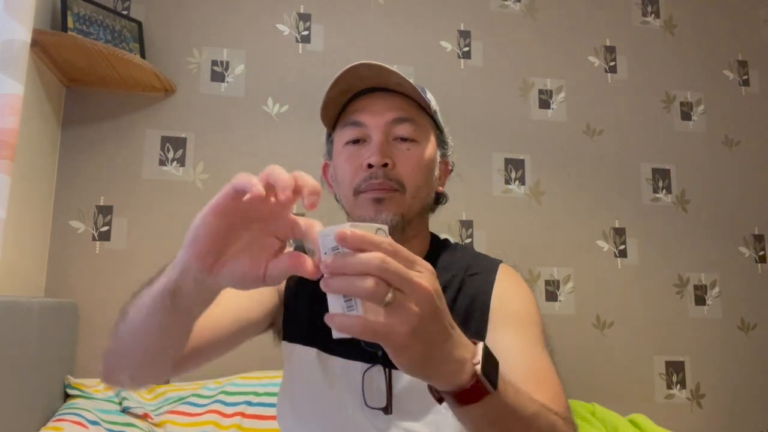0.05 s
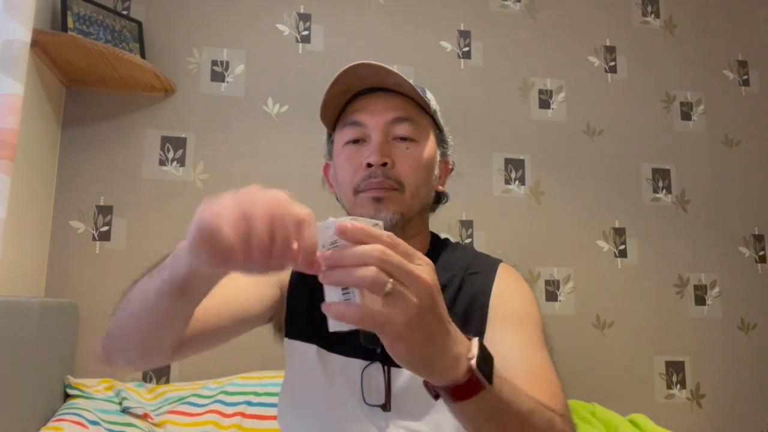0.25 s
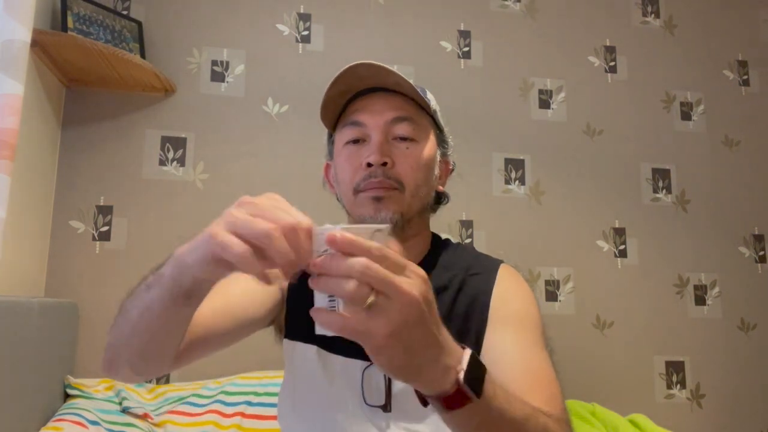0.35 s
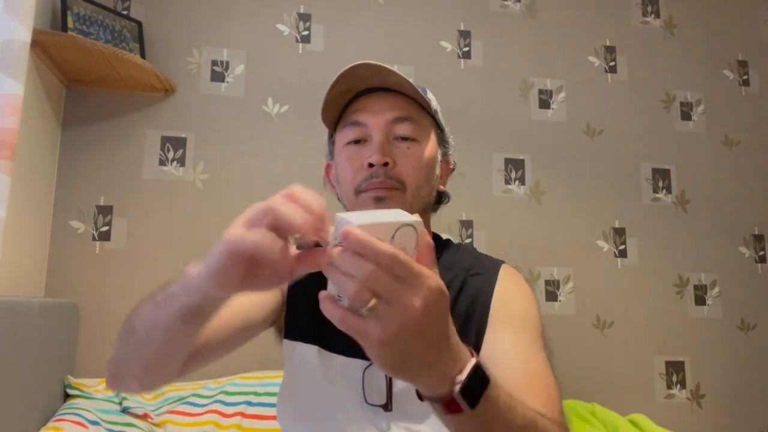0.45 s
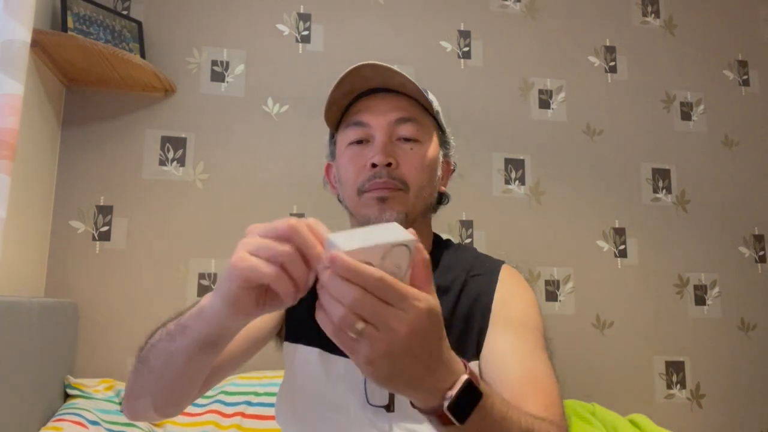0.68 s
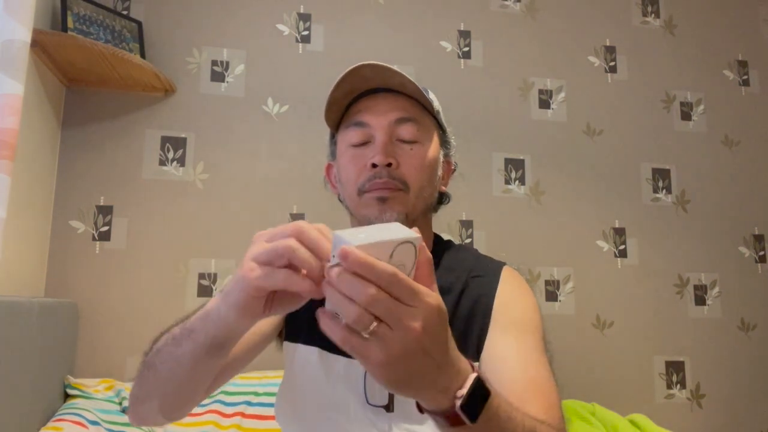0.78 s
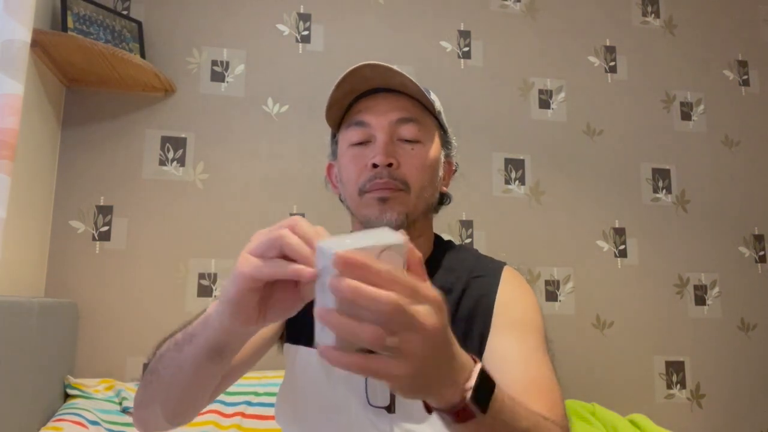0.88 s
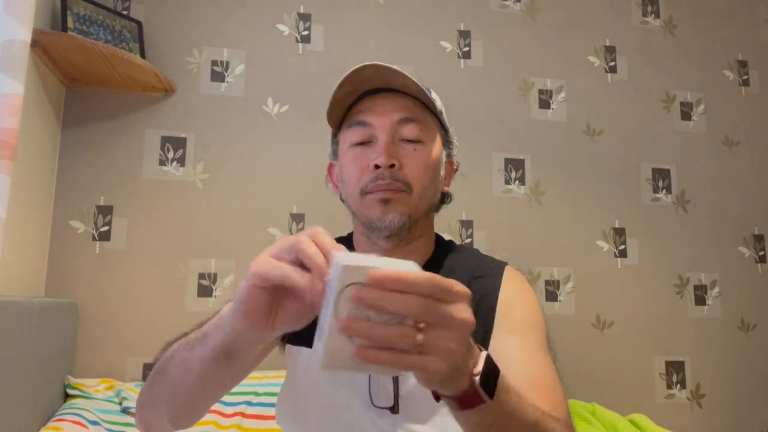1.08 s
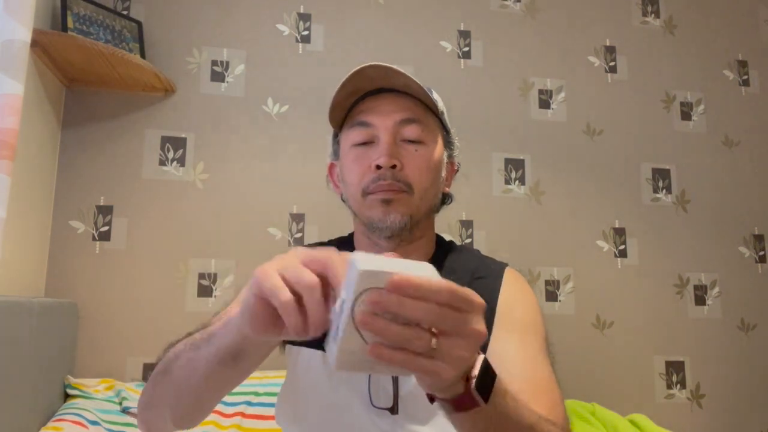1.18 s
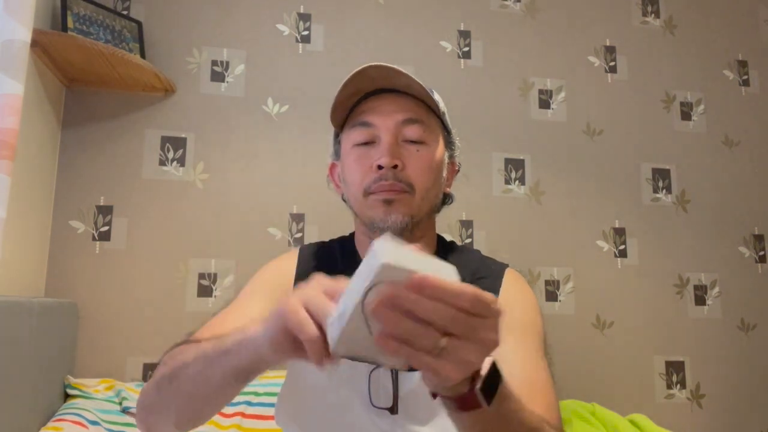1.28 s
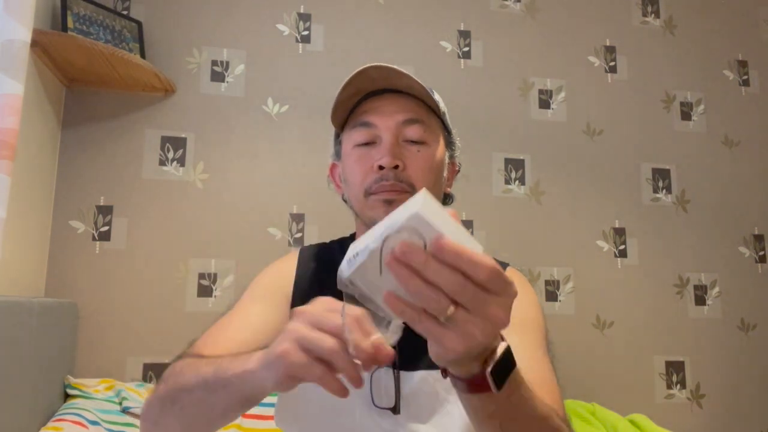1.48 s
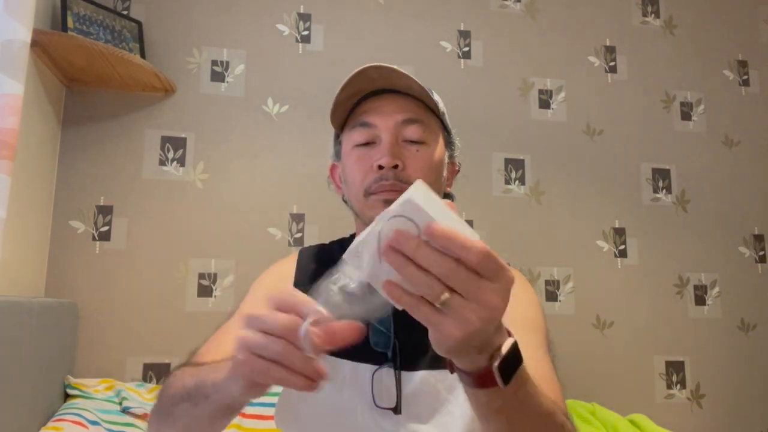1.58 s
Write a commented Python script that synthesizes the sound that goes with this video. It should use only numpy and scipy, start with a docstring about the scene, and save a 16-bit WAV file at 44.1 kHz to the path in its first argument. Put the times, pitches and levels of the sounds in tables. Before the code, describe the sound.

A small cardboard box is opened by hand, close up in a quiet furnished room. Soft finger rubs lead to a loud, sharp cluster of cracks at 0.22 s as the flap tears free. Quiet rubs, hollow taps and dull puffs follow, with a crisp snap at 0.67 s. From 1.14 to 1.42 s card scrapes grainily over card, knocking hardest near 1.31 s; light rubs and ticks finish by 1.65 s.

```python
"""Fingers rub and knock on a small hollow cardboard box, close to a stereo microphone in a quiet furnished room.
At about 0.22 s its flap snaps free in sharp cracks, bursts of noise with a crease resonance, and tears out.
Rubs, knocks, ticks and dull puffs of air follow: grains of friction, ringing box modes and low bands of noise.
From 1.14 s card slides over card in a grainy scrape, with knocks on the box; rubs and small snaps end it.
Diffuse echoes and a faint room tone surround the box."""
import sys
import numpy as np
from scipy import signal
from scipy.fft import rfft, irfft, next_fast_len
from scipy.io import wavfile
from scipy.ndimage import map_coordinates

SR = 44100
rng = np.random.default_rng(int(sys.argv[2]) if len(sys.argv) > 2 else 0)


def generate_wav(signal):
    """Clip the signal to [-1, 1] and save it as 16-bit WAV at the path in sys.argv[1]."""
    frames = np.transpose(np.atleast_2d(signal))
    scaled = np.clip(frames, -1, 1) * 32767
    pcm = np.round(scaled).astype(np.int16)
    wavfile.write(sys.argv[1], SR, pcm)


N = 72765  # samples
TIME = np.arange(N) / SR  # seconds

# Snaps and ticks of stiff card. Each row: start in seconds, level in dB before colouring,
# decay in ms, pitch of the crease in Hz, high-pass corner in Hz.
SNAPS = [(0.09, -22.5, 0.7, 10500, 4660), (0.1236, -31, 0.22, 10000, 3000), (0.1580, -34, 2.4, 8100, 900),
         (0.2064, -14, 0.28, 10500, 5000), (0.2206, 1, .55, 10700, 2500), (0.2208, 0, .65, 7000, 900),
         (0.2216, -5, .7, 4200, 1500), (0.2319, -4.5, .6, 10900, 1800), (0.2492, -3.5, .5, 11500, 3000),
         (0.2542, -49, .8, 7200, 900), (0.4950, -34, 0.97, 5840, 1000), (0.526, -41, 0.51, 6360, 800),
         (0.566, -49, 0.49, 7100, 782), (0.6710, -9.5, .8, 12200, 4500), (0.6713, -19, 1.1, 3300, 2000),
         (0.6722, -12.5, 1.1, 12000, 5000), (0.6728, -16, 1.2, 7800, 4000), (0.7500, -29, 1.2, 11300, 1980),
         (0.8620, -48, 0.48, 6000, 2510), (0.8850, -30, 1.05, 11200, 1500), (1.0113, -42, 1.3, 5040, 1500),
         (1.0570, -49, 0.31, 7040, 2520), (1.0718, -27, 1.7, 4040, 2800), (1.168, -23.5, 2.6, 11100, 4000),
         (1.2033, -22, 3.9, 5360, 2530), (1.2320, -20.5, 3.6, 5940, 990), (1.3270, -26, 0.39, 11000, 2000),
         (1.2415, -20.5, 0.82, 11200, 2000), (1.4085, -46, 0.5, 10900, 4000),
         (1.4150, -25.5, 0.61, 11100, 3880), (1.5215, -23, 0.19, 10200, 3000),
         (1.5790, -23.5, .7, 10900, 4230), (1.5930, -56, 0.43, 7800, 3070)]
# Spectral colour of the snaps. Each row: frequency in Hz, gain in dB.
SNAP_COLOUR = [(400, -3), (1200, -5.5), (2200, -1.5), (3500, -2.5), (6000, 0.5), (11000, .5), (16000, -2.5)]
CREASE_WIDTH_HZ, CREASE_DB = 1700, 1  # bandwidth; level relative to the burst

# The flap tears free. Each row of its colour: frequency in Hz, gain in dB.
TEAR_COLOUR = [(150, -29), (500, -6), (1200, -15), (2100, 13), (3000, -5.5), (4000, 13), (6000, -18),
               (11000, -7), (16000, -21)]
TEAR_START_S, TEAR_END_S, TEAR_DB, TEAR_FALL_DB_PER_S = 0.223, 0.268, -27.5, 167
TEAR_GRAINS_PER_S, TEAR_SPREAD_DB, TEAR_BOX_DB = 480, 4.5, -13

# Scrape of card on card. Each row: time in seconds, level in dB.
SLIDE = [(1.141, -56), (1.149, -38.5), (1.162, -34), (1.166, -30.5), (1.19, -32), (1.203, -36.5),
         (1.224, -37), (1.236, -35), (1.246, -27), (1.262, -35), (1.285, -34), (1.325, -41), (1.353, -31.5),
         (1.368, -36.5), (1.383, -32), (1.412, -40), (1.425, -67)]
# Spectral colour of the scrape. Each row: frequency in Hz, gain in dB.
SLIDE_COLOUR = [(100, -9.5), (300, -0.5), (700, -8.5), (1300, 0), (2300, 2), (4500, 5), (7500, 6.5),
                (12000, 9.5), (16000, -8.5)]
SLIDE_GRAINS_PER_S, SLIDE_SPREAD_DB, SLIDE_BOX_DB = 7000, 0.5, -16.5
# Near its end the card grips less and the scrape loses its middle.
SLIDE_FREE_S, SLIDE_THIN_S, SLIDE_THIN_DB, SLIDE_THIN_HZ = 1.349, 0.018, -12.5, 3340

# Fingers rub the card. Each row: start in seconds, end in seconds, level at start in dB,
# level at end in dB (before tilt and squeak), treble tilt in dB per octave, squeak in dB.
RUBS = [(0.0, 0.084, -38, -60.5, -1.5, 3.5), (0.083, 0.196, -46, -54.5, 1.5, 1.5),
        (0.184, 0.224, -70, -23, 0.5, -4), (0.369, 0.423, -52.5, -51.5, -0.5, -1),
        (0.432, 0.484, -58, -54, -1, 6.5), (0.493, 0.543, -45.5, -49.5, -2.5, 8.5),
        (0.557, 0.618, -46, -59.5, -0.5, 3), (0.663, 0.73, -44.5, -49.5, -1, 8.5),
        (0.742, 0.817, -44, -56.5, -0.5, 5), (0.826, 0.887, -48.5, -43.5, 3, 10),
        (0.901, 0.936, -48.5, -54, -3, 3), (1.012, 1.054, -50.5, -57, -2, 10),
        (1.053, 1.101, -49, -51.5, 1.5, 17.5), (1.105, 1.16, -51, -46, 1.5, 0),
        (1.412, 1.495, -65, -41.5, 1.5, 4.5), (1.496, 1.529, -41, -41.5, -1, -5.5),
        (1.538, 1.584, -44.5, -43, 0.5, 5.5), (1.596, 1.65, -50.5, -56, -0.5, 5)]
# Spectral colour of the rubs. Each row: frequency in Hz, gain in dB.
RUB_COLOUR = [(60, -18), (150, -21), (320, -4), (700, -4.5), (1400, -2.5), (2500, 2), (4000, -0.5),
              (6500, 4), (11000, 6), (16000, -6.5)]
RUB_ATTACK_S, RUB_RELEASE_S = 0.0013, 0.0091
RUB_GRAINS_PER_S, RUB_SPREAD_DB, RUB_BOX_DB = 6000, -0.5, -19
SQUEAK_HZ, SQUEAK_OCTAVES = 4150, 0.25

# Stick and slip make all friction flutter: random steps per second, depth in dB.
SLIP_PER_S, SLIP_DB = 200, 2

# Fingers and contents knock on the box. Each row: start in seconds, level in dB,
# pitch that the struck spot favours in Hz, hard tap in dB relative to that level.
KNOCKS = [(0.003, -42.5, 544, -13), (0.057, -48, 507, -21), (0.089, -50, 1010, 8), (0.158, -45, 930, 1),
          (0.167, -37.5, 505, -4.5), (0.204, -62, 546, -25), (0.2212, -14.5, 830, -4),
          (0.2304, -42, 644, 18), (0.379, -41.5, 655, 0), (0.473, -36.5, 700, -9), (0.492, -57, 610, 2),
          (0.529, -43.5, 617, 1.5), (0.545, -60.5, 490, 18), (0.563, -56.5, 650, 4),
          (0.706, -47.5, 500, -12), (0.756, -49, 590, -3), (0.802, -46.5, 560, -10),
          (0.843, -48.5, 554, -5), (0.887, -37, 536, -7), (0.928, -38.5, 485, -2.5), (1.034, -49, 396, -21),
          (1.119, -49.5, 484, -16), (1.150, -31.5, 487, -12.5), (1.180, -42, 483, -6),
          (1.206, -39.5, 490, -15), (1.244, -37, 520, -7), (1.276, -34.5, 560, -4),
          (1.306, -27.5, 513, -16), (1.313, -24.5, 624, -4), (1.324, -23.5, 650, -19),
          (1.356, -33.5, 610, -18), (1.393, -37, 504, -9), (1.443, -55.5, 530, 8), (1.497, -56, 610, -12)]
# Resonances of the hollow box. Each row: frequency in Hz, level in dB, T60 in seconds.
BOX_MODES = [(394, -8, 0.029), (503.3, 1, 0.065), (609.5, -5.5, 0.081), (846, -4.5, 0.031),
             (1080, -9, 0.034), (1168, -11.5, 0.057), (1400, -3, 0.015), (2103, -8.5, 0.042),
             (2236, -25, 0.15)]
SPOT_DB_PER_OCT, CONTACT_S, GRIP_DETUNE = 15, 0.0012, 0.013  # detune: fraction of the mode's pitch
TAP_DECAY_S, TAP_LOW_HZ, TAP_HIGH_HZ = 0.0013, 572, 1440

# The box flexes and pushes air. Each row: start in seconds, level in dB, decay in seconds,
# lowest frequency in Hz, top frequency in Hz.
PUFFS = [(0.224, -53, 0.0082, 121, 408), (0.244, -66, 0.049, 35, 80), (0.478, -67.5, 0.083, 59.4, 220),
         (0.53, -54, 0.027, 220, 400), (0.675, -53, 0.021, 102, 330), (0.92, -64.5, .04, 45, 113),
         (1.032, -57.5, 0.015, 135, 390), (1.241, -53, .025, 50, 181), (1.313, -49, 0.024, 110, 353),
         (1.333, -53, 0.011, 35.4, 93), (1.502, -66.5, 0.13, 126, 377)]

# The box drifts to the right. Each row: time in seconds, lead of the right channel in ms,
# left minus right level in dB.
DRIFT = [(0.0, 0.024, 4.5), (0.23, 0.063, 2.5), (0.67, 0.068, 0), (1.2, 0.065, -0.5), (1.65, 0.069, -0.5)]

# Reverberation time of the room. Each row: frequency in Hz, T60 in seconds.
ROOM_T60 = [(150, 0.34), (530, 0.42), (1400, 0.21), (3700, 0.32), (7000, 0.096), (12000, 0.25)]
# Strength of the echoes. Each row: frequency in Hz, level in dB.
ROOM_SEND = [(100, -2), (500, -10), (1000, -1), (2200, -2), (4500, -11), (8000, 0), (13000, -22.5)]
# Coherence of diffuse sound. Each row: frequency in Hz, left-right likeness from -1 to 1.
ROOM_LIKENESS = [(100, 0.59), (300, 0.19), (700, -0.8), (1400, -0.69), (4000, 0.38), (15000, 0.0084)]
FIRST_ECHO_S = 0.0045
# Spectrum of the room tone. Each row: frequency in Hz, relative level in dB.
FLOOR = [(25, -44), (35, -2), (48, 0), (80, -3.5), (200, -5.5), (500, -19.5), (2000, -16), (8000, -13),
         (16000, -27)]
FLOOR_DB = -66

# Hollows in the microphone's treble. Each row: centre in Hz, half width in Hz, gain in dB.
MIC_DIPS = [(9000, 620, -21), (14450, 750, -12)]
CLIP_TOP, STOP_HZ = 0.95, 16800  # overload height; edge of the 60 dB stopband


def snaps():
    """Fracture: breaking fibres give a brief decaying noise burst that excites the crease's resonance."""
    out, t = np.zeros(N), TIME[:SR // 50]
    noises = rng.standard_normal((len(SNAPS), 2, len(t)))
    crease_t60 = np.log(1000) / (np.pi * CREASE_WIDTH_HZ)
    for (start, db, decay_ms, crease_hz, low_hz), noise in zip(SNAPS, noises):
        fade = np.exp(-t * 1000 / decay_ms)
        crease = ring(noise[1] * fade, crease_hz, crease_t60)
        burst = rms_one(noise[0] * fade) + from_db(CREASE_DB) * rms_one(crease)
        high_pass = signal.butter(2, low_hz, "high", fs=SR, output="sos")
        burst = rms_one(signal.sosfilt(high_pass, burst))
        # A longer decay holds more energy.
        add(out, start, from_db(db) * burst * np.sqrt(np.mean(fade ** 2)))
    return colour(out, lambda hz: at_hz(SNAP_COLOUR, hz))


def tear():
    """Sparse friction: the flap drags out of its slot in a coarse, falling mid-range crackle."""
    gate = (TIME > TEAR_START_S) * np.clip((TEAR_END_S - TIME) / RUB_ATTACK_S, 0, 1)
    level_db = TEAR_DB - TEAR_FALL_DB_PER_S * np.maximum(TIME - TEAR_START_S, 0)
    crackle = friction(TEAR_GRAINS_PER_S, TEAR_SPREAD_DB, TEAR_COLOUR, TEAR_BOX_DB)
    return gate * from_db(level_db) * crackle


def slide():
    """Dense friction: card scrapes over card, and its middle range thins as the grip loosens."""
    s, db = np.transpose(SLIDE)
    tight = friction(SLIDE_GRAINS_PER_S, SLIDE_SPREAD_DB, SLIDE_COLOUR, SLIDE_BOX_DB)
    loose = colour(tight, lambda hz: SLIDE_THIN_DB * hump(hz, SLIDE_THIN_HZ, octaves=0.65))
    free = np.clip((TIME - SLIDE_FREE_S) / SLIDE_THIN_S + 0.5, 0, 1)
    level_db = np.interp(TIME, s, db, left=-np.inf, right=-np.inf)  # silent outside the table
    return from_db(level_db) * ((1 - free) * tight + free * loose)


def rubs():
    """Friction in short strokes: each has its own loudness slope, brightness and tendency to squeak."""
    grain = friction(RUB_GRAINS_PER_S, RUB_SPREAD_DB, RUB_COLOUR, RUB_BOX_DB)
    out, size = np.zeros(N), next_fast_len(N)
    spectrum, hz = rfft(grain, size), np.fft.rfftfreq(size, 1 / SR)
    octaves = np.log2(np.maximum(hz, 600) / 5000)  # the tilt pivots at 5 kHz
    squeak = hump(hz, SQUEAK_HZ, SQUEAK_OCTAVES)
    for start, end, start_db, end_db, tilt, squeak_db in RUBS:
        attack = np.clip((TIME - start) / RUB_ATTACK_S, 0, 1)
        release = np.exp(-np.maximum(TIME - end, 0) / RUB_RELEASE_S)
        level = from_db(np.interp(TIME, [start, end], [start_db, end_db]))
        stroke = irfft(spectrum * from_db(tilt * octaves + squeak_db * squeak), size)[:N]
        out += attack * release * level * stroke
    return out


def friction(per_s, spread_db, spectrum, box_db):
    """Stick-slip: fibres catch and let go in fluttering swarms of clicks, which also excite the box modes."""
    sizes = from_db(spread_db * np.minimum(rng.exponential(1, N), 5)) * rng.choice([-1, 1], N)
    flutter = np.interp(TIME * SLIP_PER_S, np.arange(N), rng.standard_normal(N))
    clicks = sizes * (rng.random(N) < per_s / SR) * from_db(SLIP_DB * flutter)
    hollow = np.zeros(N)
    for k, (hz, db, t60) in enumerate(BOX_MODES):
        hollow += (-1) ** k * from_db(db) * ring(clicks, hz, t60)
    grains = colour(clicks, lambda hz: at_hz(spectrum, hz))
    return rms_one(grains) + from_db(box_db) * rms_one(hollow)


def knocks():
    """Modal excitation: a blow gives a dry tap, and modes near the struck spot's pitch answer most."""
    out, t = np.zeros(N), TIME[:SR // 5]
    contact = 1 - np.exp(-t / CONTACT_S)
    chances = rng.standard_normal((len(KNOCKS), len(BOX_MODES)))
    for (start, db, spot_hz, tap_db), chance in zip(KNOCKS, chances):
        add(out, start, from_db(db + tap_db) * thud(TAP_LOW_HZ, TAP_HIGH_HZ, TAP_DECAY_S))
        for (hz, mode_db, t60), grip in zip(BOX_MODES, chance):
            spot_loss_db = SPOT_DB_PER_OCT * abs(np.log2(hz / spot_hz))
            level_db = db + mode_db - spot_loss_db - 60 * t / t60
            tone = np.sin(2 * np.pi * hz * (1 + GRIP_DETUNE * grip) * t)
            add(out, start, from_db(level_db) * contact * tone)
    return out


def puffs():
    """Volume displacement: flexing walls push air in dull, dying bands of low noise."""
    out = np.zeros(N)
    for start, db, decay_s, low_hz, top_hz in PUFFS:
        add(out, start, from_db(db) * thud(low_hz, top_hz, decay_s))
    return out


def drift(box):
    """Interaural cues: changing delay and level between the channels move the box to the right."""
    s, lead_ms, balance_db = np.transpose(DRIFT)
    lag = np.interp(TIME, s, lead_ms) * SR / 1000  # samples
    late = map_coordinates(box, [np.arange(N) - lag], order=5)
    lean = from_db(np.interp(TIME, s, balance_db) / 2)
    return np.array([late * lean, box / lean])


def room(x):
    """Reverberation: diffuse echoes, modelled as noise, die exponentially at a rate set band by band."""
    t, tail = TIME[:SR // 2], 0
    edges = np.geomspace(40, 19000, 19)
    for low, high in zip(edges, edges[1:]):
        hz = np.sqrt(low * high)
        fade = from_db(-60 * t / at_hz(ROOM_T60, hz)) * (t > FIRST_ECHO_S)
        band_pass = signal.butter(2, [low, high], "band", fs=SR, output="sos")
        band = rms_one(signal.sosfilt(band_pass, stereo_noise(hz, len(t)) * fade))
        # Energy follows bandwidth, whatever the decay time.
        share = np.sqrt(2 * (high - low) / SR / len(t))
        tail = tail + from_db(at_hz(ROOM_SEND, hz)) * band * share
    return signal.fftconvolve(x[None], tail, axes=1)[:, :N]


def room_tone():
    """Stationary noise: a steady coloured background, with the left-right coherence of 200 Hz."""
    floor = colour(stereo_noise(200, N), lambda hz: at_hz(FLOOR, hz))
    return from_db(FLOOR_DB) * rms_one(floor)


def stereo_noise(hz, size):
    """Coherence: sum and difference noises make two channels as alike as diffuse sound at hz."""
    alike = np.clip(at_hz(ROOM_LIKENESS, hz), -1, 1)
    mid, side = rng.standard_normal((2, size))
    return np.sqrt(1 + alike) * mid + np.sqrt(1 - alike) * side * np.array([[1], [-1]])


def thud(low_hz, high_hz, decay_s):
    """Damped band noise: a burst in one band starts at about rms 1 and decays exponentially."""
    fade = np.exp(-TIME[:SR // 2] / decay_s)
    noise = rng.standard_normal(len(fade)) * fade + 1e-18
    band_pass = signal.butter(2, [low_hz, high_hz], "band", fs=SR, output="sos")
    return rms_one(signal.sosfilt(band_pass, noise)) * np.sqrt(np.mean(fade ** 2))


def ring(push, hz, t60):
    """Damped resonator: two poles turn a unit click into a dying sine that starts at height 1."""
    r, w = from_db(-60 / (t60 * SR)), 2 * np.pi * hz / SR
    return signal.lfilter([0, np.sin(w)], [1, -2 * r * np.cos(w), r * r], push + 1e-18)


def colour(x, curve_db):
    """Minimum phase: folding the cepstrum gives a causal filter whose gain is curve_db(Hz)."""
    size = 2 * next_fast_len(N)
    cepstrum = irfft(np.log(from_db(curve_db(np.fft.rfftfreq(size, 1 / SR)))))
    cepstrum[1:size // 2] *= 2
    cepstrum[size // 2 + 1:] = 0
    return irfft(rfft(x, size) * np.exp(rfft(cepstrum)))[..., :N]


def hump(hz, centre_hz, octaves):
    """Resonance shape: a bell curve of height 1 on a log-frequency axis."""
    return np.exp(-(np.log2(np.maximum(hz, 1) / centre_hz) / octaves) ** 2)


def at_hz(points, hz):
    """Logarithmic pitch: interpolate a table on a log-frequency axis."""
    f, v = np.transpose(points)
    return np.interp(np.log(np.maximum(hz, 1)), np.log(f), v)


def from_db(db):
    """Level law: 20 dB is a tenfold amplitude."""
    return 10 ** (np.asarray(db) / 20)


def rms_one(x):
    """Mean power: scale a signal to rms 1."""
    return x / np.sqrt(np.mean(x ** 2) + 1e-20)


def add(out, s, sound):
    """Superposition: mix a sound in at time s in seconds."""
    i = int(np.clip(s * SR, 0, N - 1))
    out[i:i + len(sound)] += sound[:N - i]


def scene():
    """Superposition: the drifting direct sound of the box, its echoes and the room tone add up."""
    box = snaps() + tear() + slide() + rubs() + knocks() + puffs()
    return drift(box) + room(box) + room_tone()


def record(dry):
    """Transduction: the microphone has two treble hollows, clips at overload and loses the top."""
    def dips_db(f):
        return sum(db * np.exp(-((f - hz) / width) ** 2) for hz, width, db in MIC_DIPS)
    heard = np.clip(colour(dry, dips_db), -CLIP_TOP, CLIP_TOP)
    low_pass = signal.cheby2(16, 60, STOP_HZ, fs=SR, output="sos")
    return signal.sosfilt(low_pass, heard)


dry = scene()
out = record(dry)
generate_wav(out)
```